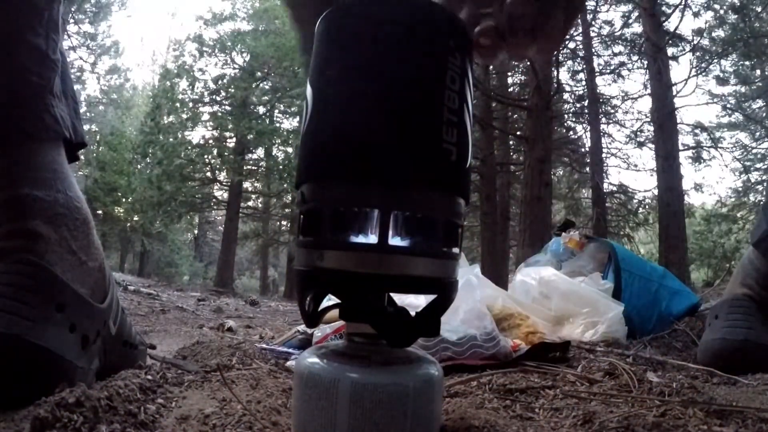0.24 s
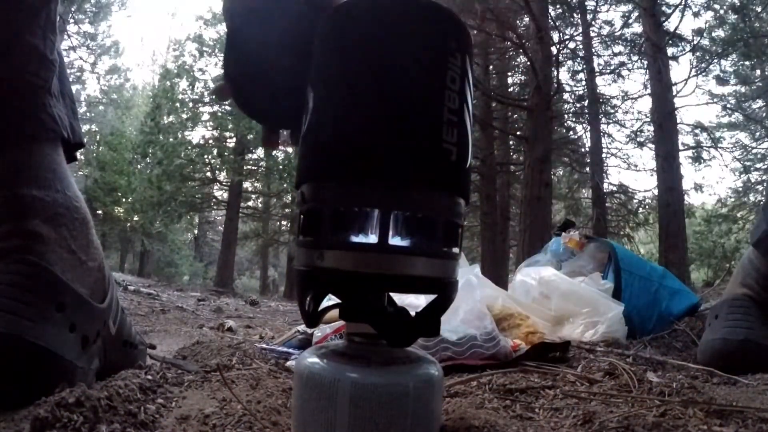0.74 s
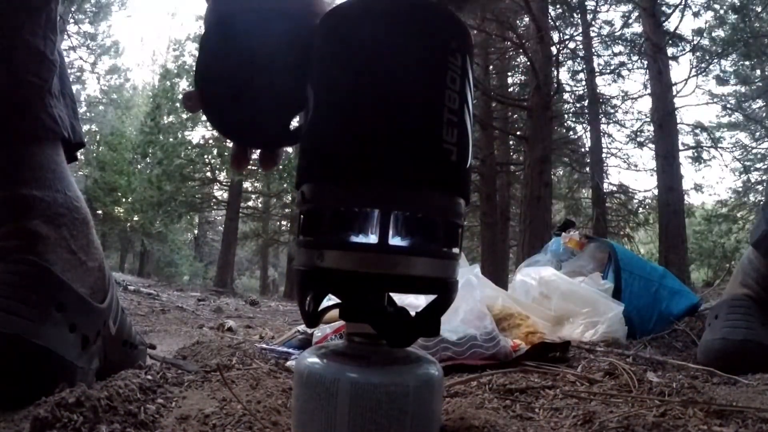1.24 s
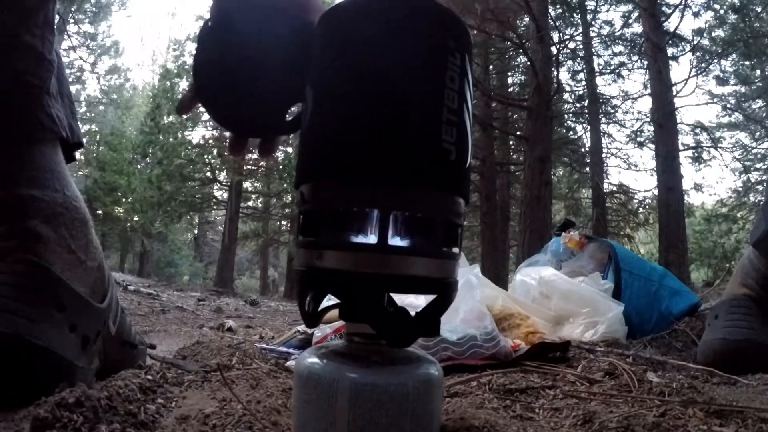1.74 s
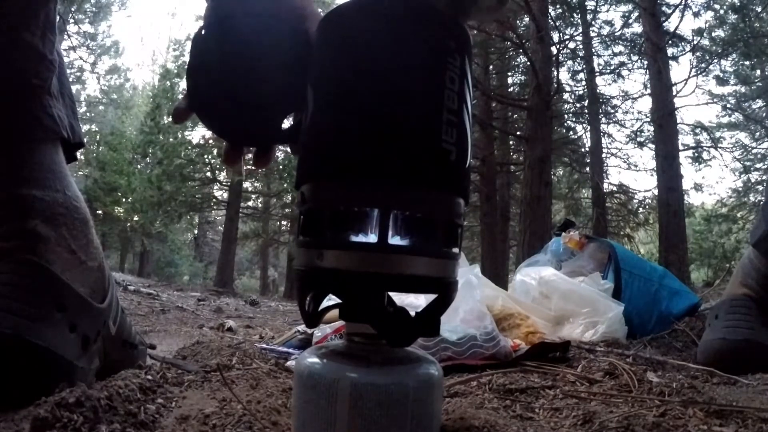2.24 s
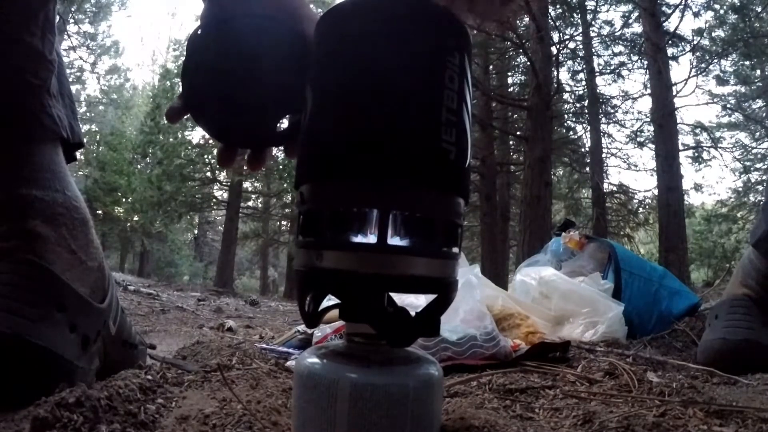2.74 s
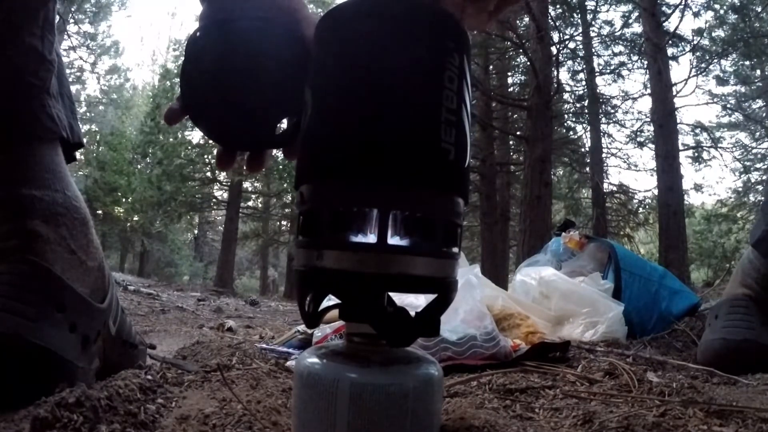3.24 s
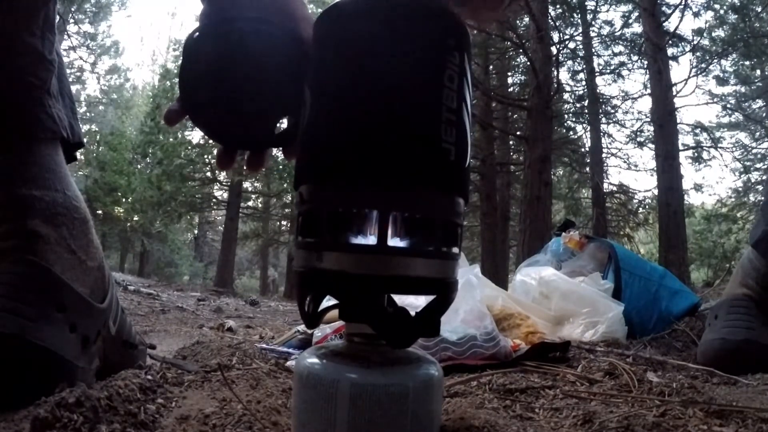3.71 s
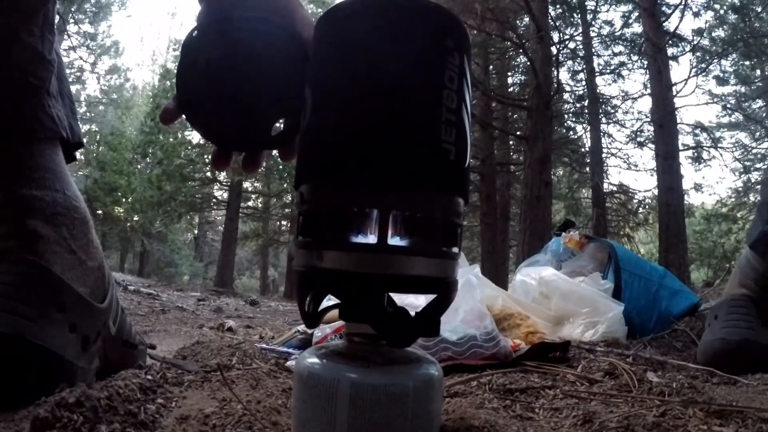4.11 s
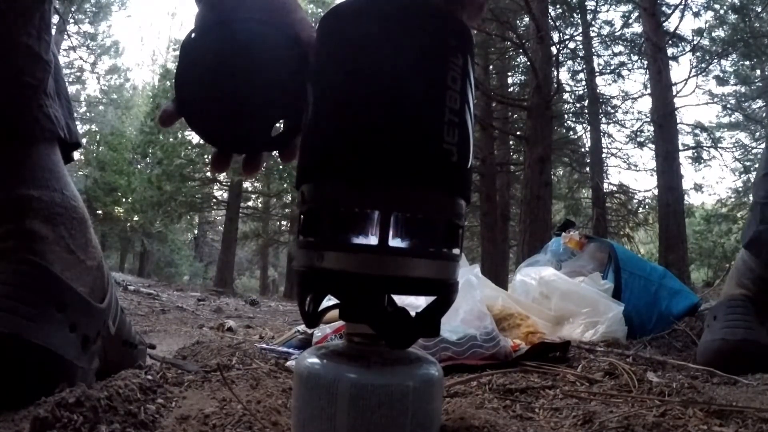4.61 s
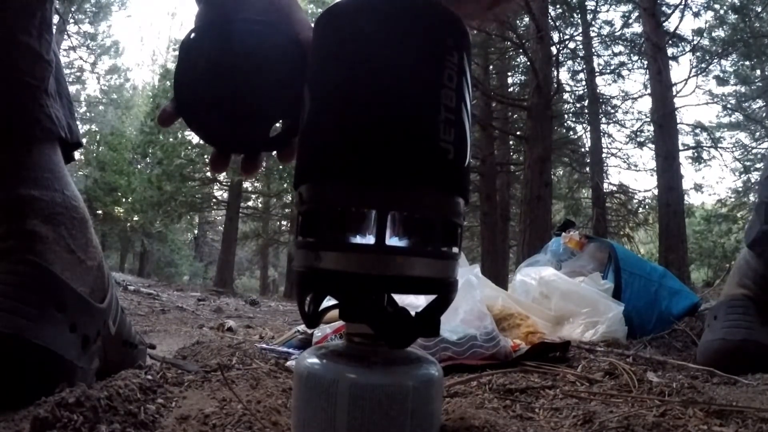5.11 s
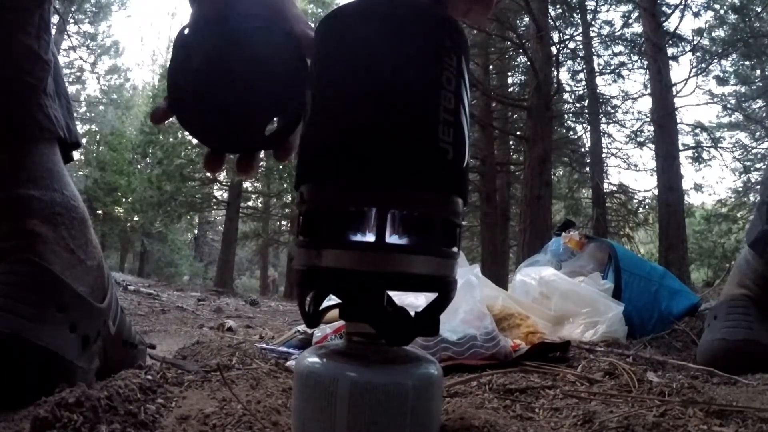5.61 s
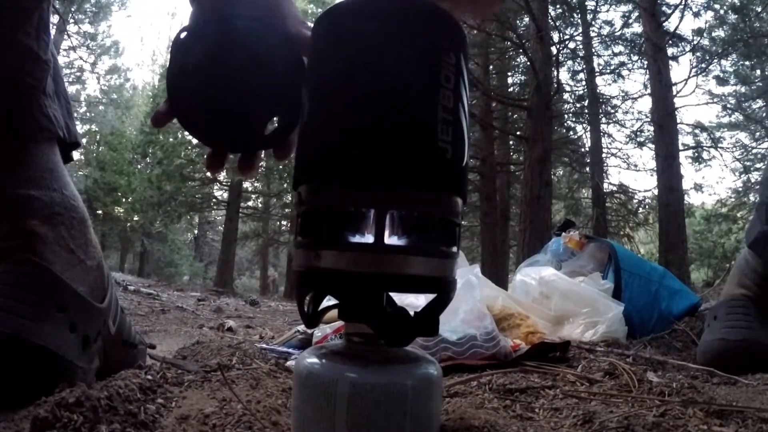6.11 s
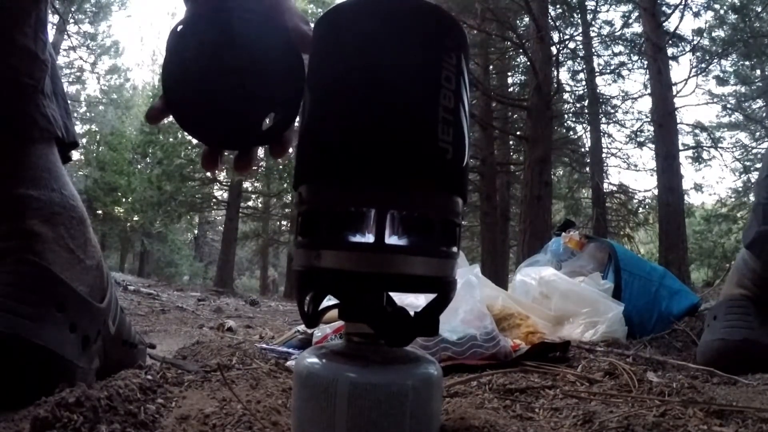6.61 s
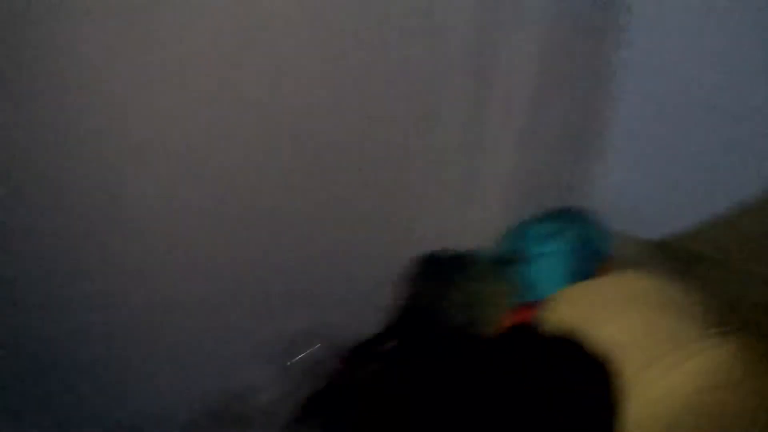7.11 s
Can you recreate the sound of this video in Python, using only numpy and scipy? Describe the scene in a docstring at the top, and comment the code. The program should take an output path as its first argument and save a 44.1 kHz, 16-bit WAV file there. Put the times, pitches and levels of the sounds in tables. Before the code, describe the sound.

Close steady gas flame rumbles and hisses under a pot with occasional spits and ticks, fades out, then a handled camera thumps amid swelling fabric rustle.

```python
"""A backpacking gas stove roars and flutters at full flame under a pot, close to a camera; its jet hisses. A
hand close to the pot colours the hiss until 0.95 s; throughout, the gas whistles faintly at drifting pitches.
From 2.5 s drips sizzle and spit on the hot metal and the pot ticks on its stand. The stove scene fades out from
5.96 s to silence at 6.85 s; then the scene changes to a tent, where nylon rustles ever louder while a hand
grips, knocks and scrapes the camera. Noise makes the gas, water and nylon; ringing modes the blows."""
import sys
import numpy as np
from scipy import signal
from scipy.fft import rfft, irfft
from scipy.io import wavfile

SR = 44100
rng = np.random.default_rng(int(sys.argv[2]) if len(sys.argv) > 2 else 0)


def bounce(signal):
    """Save signal as a 16-bit WAV file at the path given by the first command-line argument."""
    frames = np.transpose(np.atleast_2d(signal))
    limited = np.clip(frames, -1, 1)
    pcm = np.round(limited * 32767).astype(np.int16)
    wavfile.write(sys.argv[1], SR, pcm)


N = 324135
TIME_S, FREQ_HZ = np.arange(N) / SR, np.arange(N // 2 + 1) * SR / N
FADE_OUT_S, SILENT_S, FADE_POWER = 5.96, 6.852, 1.094
FADE_IN_S = 0.018  # tent, from SILENT_S

# flame strength re usual burn: t/s, level/dB
FLAME_STRENGTH = [(0.0, 0.5), (1.25, -0.5), (1.65, -2), (1.9, 1.5), (2.0, -3.5), (2.15, -1), (2.4, -1.2),
                  (3.3, -0.5), (3.7, 1), (4.15, 1), (4.4, 2), (5.1, -4.5), (5.2, 1), (5.35, -4), (5.45, 3),
                  (5.65, -3.5), (5.95, 1), (6.15, -2)]
# combustion roar, relative density: f/Hz, level/dB
ROAR_SPECTRUM = [(20, -63), (60, -50), (110, -31), (123, -30), (134, -9), (147, 0), (185, 1.5), (260, -6),
                 (400, -15), (700, -25), (950, -36), (1500, -49.5), (3000, -68.5)]


def flame(flutter, surge_db=0.5, flutter_db=0.86, sputter_db=1.0, boom_db=1.3, roar_db=-29.0):
    """Turbulent burning: flame surges, heat release flutters, small eddies sputter; the cup booms with the flutter."""
    strength_db = curves(FLAME_STRENGTH)[0] + surge_db * walk(4.4)
    sputter = walk(103)
    eddies = rng.standard_normal(N) * undb(strength_db + flutter_db * flutter + sputter_db * sputter)
    boom = band(eddies, 228, 88) * (undb(boom_db * flutter) - 1)
    return colour(eddies + boom, ROAR_SPECTRUM) * undb(roar_db)


# jet turbulence, relative density: f/Hz, level/dB
JET_SPECTRUM = [(400, -13), (1000, -9), (1450, -14), (1950, -3.5), (2600, -4), (3050, -7), (4600, -15.5),
                (6200, -13), (8300, -18.5), (8900, -20.5), (10000, -20), (11300, -28.5), (12600, -23),
                (15000, -40)]
# mixing tube and burner cavity: f/Hz, width/Hz, lift/dB
BURNER_MODES = [(1130, 180, 5.5), (2400, 340, 4), (2470, 120, 2), (2740, 110, 3), (3722, 25, 4),
                (3840, 230, 6), (4135, 80, 7.5), (4500, 60, 6.5), (4965, 130, 6.5), (5480, 220, 6),
                (6500, 450, 4), (8050, 350, 2)]
# gap between hand and pot, peaks and dips: f/Hz, width/Hz, lift/dB
HAND_GAP_MODES = [(2440, 100, 4), (2660, 130, -2), (2820, 80, 3), (3020, 170, -6), (3300, 160, 7.5),
                  (3630, 140, -6), (4050, 300, 1), (4950, 200, 2), (6550, 300, 3), (8900, 600, -4)]
# hand moves off: t/s, nearness/0-1
HAND_NEARNESS = [(0, .75), (.3, .7), (.43, 1), (.58, 0.7), (.72, 0.3), (.95, 0), (2.3, 0)]
# canister cools and loses pressure: the hiss sinks
JET_START_DB, JET_SAG_DB_PER_S = -47.5, 0.41


def jet(flutter, flutter_db=0.5, waver_db=0.9, wander_db=0.6):
    """Gas hisses out and rings the burner; registers waver and wander independently; a near hand filters it."""
    hiss = colour(rng.standard_normal(N), JET_SPECTRUM)
    hiss = vary_bands(hiss, [(2400, 380), (3900, 800), (5500, 990), (8200, 1300)], waver_db, 26)
    hiss = vary_bands(hiss, [(2300, 170), (2700, 140), (3300, 180)], wander_db, 6.2)
    hiss = unit(resonate(hiss, BURNER_MODES))
    through_gap = resonate(hiss, HAND_GAP_MODES)
    hiss = hiss + curves(HAND_NEARNESS)[0] * (through_gap - hiss)
    return hiss * undb(JET_START_DB - JET_SAG_DB_PER_S * TIME_S + flutter_db * flutter)


# drip: flash, sag as it shrinks, tail; hiss rises meanwhile
DRIP_ATTACK_SHARE, DRIP_TAIL_SHARE = 0.31, 0.3  # of drip length
DRIP_EDGE_S, DRIP_SAG_DB_PER_S, DRIP_RISE_OCT_PER_S = 0.0034, 71, 6.4


def boil(s, length_s):
    """Envelope of one drip: flash, sag, tail; a longer drip starts and ends more softly."""
    attack = ramp(s, DRIP_EDGE_S + DRIP_ATTACK_SHARE * length_s)
    sag_db = DRIP_SAG_DB_PER_S * length_s * ramp(s, length_s)
    tail = np.exp(-np.maximum(TIME_S - s - length_s, 0) / (DRIP_TAIL_SHARE * length_s))
    return attack * undb(-sag_db) * tail


# drips boiling off hot metal, levels before the envelope:
# t/s, length/s, steam/dB, steam centre f/Hz, spatter/dB, spray/dB
DRIP_EVENTS = [ (2.47, .1, -51, 2600, -48, -72), (3.383, 0.024, -51, 3450, -56, -74),
               (3.632, 0.038, -48, 3600, -45.5, -70), (3.708, .042, -53, 3600, -48.5, -70),
               (4.538, 0.045, -38.5, 3570, -48.5, -59), (4.595, 0.037, -44, 3500, -52, -60),
               (4.633, 0.032, -46.5, 2900, -59, -72), (4.693, 0.026, -41, 2750, -70, -76),
               (5.156, 0.1, -44, 3000, -67, -64), (5.222, 0.048, -38.5, 3300, -57, -70),
               (5.272, 0.04, -41.5, 4500, -59, -61), (5.314, 0.035, -45, 3400, -53, -74),
               (5.895, 0.0088, -42.5, 3250, -52, -74.5), (5.931, 0.012, -40, 3870, -52, -66),
               (5.955, .005, -42, 3600, -55, -72), (5.963, 0.019, -40, 3700, -49, -64),
               (5.992, .015, -39.5, 3300, -52, -64), (6.006, .016, -38, 4150, -51, -59),
               (6.022, 0.032, -42, 3850, -53, -60), (6.061, .009, -44.5, 3600, -62, -76),
               (6.106, .013, -49, 3600, -70, -79.5), (6.12, 0.011, -34.5, 3700, -70, -78)]
# escaping steam, relative density: f/Hz, level/dB
STEAM_SPECTRUM = [(1200, -11), (2000, 12), (2600, 7.5), (4500, 0.5), (6000, -1), (8500, -9), (15000, -20)]
# gaps between the fins under the pot: f/Hz, width/Hz, lift/dB
FIN_MODES = [(2770, 350, 8.5), (3270, 260, 2.5), (3665, 280, 10), (4360, 100, 8), (4900, 360, 5.5)]
# fine spray, relative density: f/Hz, level/dB
SPRAY_SPECTRUM = [(5000, -2), (8000, -4), (10000, 4), (11200, -1), (12400, 2), (13800, -2), (15000, -6)]


def sizzles(spatter_hz=1130, spatter_width_hz=520, steam_width_hz=2300):
    """Drips flash to steam between the fins; spatter rings the burner cavity; fine spray fizzes."""
    spitting = undb(1.5 * walk(170))
    steam = resonate(colour(crackle(spread_db=2.5) * spitting, STEAM_SPECTRUM), FIN_MODES)
    spatter = band_twice(crackle(spread_db=0.5), spatter_hz, spatter_width_hz)
    spray = colour(crackle(spread_db=1), SPRAY_SPECTRUM)
    out = np.zeros(N)
    for s, length_s, steam_db, hz, spatter_db, spray_db in DRIP_EVENTS:
        gone = ramp(s, length_s)
        rise = 2 ** (DRIP_RISE_OCT_PER_S * length_s / 2)
        early = band_twice(steam, hz / rise, steam_width_hz)
        late = band_twice(steam, hz * rise, steam_width_hz)
        puff = (1 - gone) * early + gone * late
        drip = undb(steam_db) * puff + undb(spatter_db) * spatter + undb(spray_db) * spray
        out += boil(s, length_s) * drip
    return out


# droplets bursting at once: t/s, level/dB, f/Hz
SPIT_EVENTS = [(2.516, -51, 10000), (3.406, -46, 3680), (3.666, -52, 9000), (3.737, -44, 3700),
               (4.575, -48, 9500), (5.251, -41, 3600), (5.939, -43, 5200), (6.068, -48, 3700)]


def spits(decay_s=0.0015, width_share=0.7):
    """Tiny droplets burst at once: abrupt band-noise ticks with exponential decay."""
    noise, out = rng.standard_normal(N), np.zeros(N)
    for s, db, hz in SPIT_EVENTS:
        tick = band_twice(noise, hz, width_share * hz)
        out += undb(db) * (TIME_S > s) * np.exp(-np.abs(TIME_S - s) / decay_s) * tick
    return out


# pot on its stand, relative levels: f/Hz, t60/s, level/dB
POT_MODES = [(557, 0.014, 0), (805, 0.017, 3.5), (1140, 0.023, 0), (1130, 0.052, -16), (2600, 0.0076, 1),
             (3640, 0.006, -1)]
# pot against stand, peak before the high-pass: t/s, level/dB
POT_TICKS = [(2.484, -34), (2.548, -31), (3.64, -35), (3.754, -36), (4.365, -23.5), (4.552, -26.5),
             (4.596, -29), (5.8955, -32), (5.9005, -32), (5.930, -33), (5.936, -31), (5.956, -32),
             (5.963, -34), (5.977, -31), (5.997, -35), (6.012, -32), (6.028, -30), (6.039, -30)]


def pot(pitch_share=0.03, scatter_db=0.5):
    """Pot shifts on its stand: light ticks without bass; each contact point rings a little differently."""
    out, chance = np.zeros(N), rng.standard_normal((len(POT_TICKS), len(POT_MODES) + 1))
    for (s, db), (detune, *weights) in zip(POT_TICKS, chance):
        stretch = 1 + pitch_share * detune
        modes = [(hz * stretch, t60_s, g + scatter_db * w) for (hz, t60_s, g), w in zip(POT_MODES, weights)]
        out += strike(modes, s, db, contact_s=0.000084)
    return highpass(out, 200)


# jet whistle, drifts then settles: t/s, f/Hz, level/dB
JET_WHISTLE = [(0, 8150, -72), (.17, 8450, -73.5), (.3, 8120, -74), (.47, 8330, -74), (.75, 8200, -78.5),
               (.93, 8600, -67), (1.15, 8500, -73.5), (1.3, 8200, -75), (1.52, 8620, -72),
               (1.8, 8300, -75.5), (2.2, 8000, -75.5), (2.7, 8070, -75)]
# breathy mixing-tube whistle near 5.5 kHz, drifts: t/s, f/Hz, level/dB
TUBE_WHISTLE = [(0, 5500, -60), (.55, 5490, -61), (.8, 5590, -59), (1.1, 5520, -61), (2.4, 5500, -62),
                (2.65, 5390, -65.5), (3.9, 5440, -64), (4.25, 5420, -59), (4.5, 5490, -62),
                (6.2, 5460, -64)]


def whistles(jet_width_hz=200, tube_width_hz=230):
    """Two breathy gas whistles: narrow noise drifting in pitch and strength."""
    jet_hz, jet_db = curves(JET_WHISTLE)
    tube_hz, tube_db = curves(TUBE_WHISTLE)
    return undb(jet_db) * narrow(jet_hz, jet_width_hz) + undb(tube_db) * narrow(tube_hz, tube_width_hz)


def crack(s, db, contact_s, crack_db=-11, decay_s=0.0019, hard_s=0.00016, centre_hz=4000):
    """Bright click of a blow, stronger for a hard, brief contact."""
    age_s = TIME_S - s
    noise = unit(band(rng.standard_normal(N), centre_hz, 2 * centre_hz))
    burst = (age_s > 0) * np.exp(-np.abs(age_s) / decay_s) * noise
    return burst * undb(db + crack_db) * np.exp(-contact_s / hard_s)


# camera housing, relative levels: f/Hz, t60/s, level/dB
HOUSING_MODES = [(67, 0.066, -0.5), (227, 0.15, -11.5), (357, 0.014, 4.5), (540, .025, -5.5),
                 (805, 0.014, -0.5), (1115, 0.039, -4.5), (1230, 0.026, -3.5), (1660, 0.033, -11.5),
                 (1870, 0.041, -6)]
# knocks on the camera, ring peak before the high-pass: t/s, level/dB, contact/s
KNOCK_EVENTS = [(6.8992, -34, 0.001), (6.9109, -10.5, 0.00072), (6.9173, -6.5, 0.0043),
                (6.989, -29, 0.0063), (7.034, -30.5, 0.0018), (7.1392, -27, 0.00066), (7.336, -17, 0.0041)]


def knocks():
    """Blows ring the camera housing and click."""
    blows = sum(strike(HOUSING_MODES, *knock) + crack(*knock) for knock in KNOCK_EVENTS)
    return highpass(blows, 31)  # microphone leaks steady pressure


# brightens as the slide speeds up; usual colour at NYLON_USUAL_S
NYLON_BRIGHTEN_DB_PER_S, NYLON_USUAL_S = 18, 7.14
# sliding nylon, relative density: f/Hz, level/dB
NYLON_SPECTRUM = [(100, 5), (200, 18), (380, 7), (1000, 3), (1900, -4.5), (2800, -5.5), (5500, -9.5),
                  (8000, -20), (11000, -28), (15000, -44)]
# camera shell: f/Hz, width/Hz, lift/dB
SHELL_MODES = [(1010, 130, 1), (1860, 170, 5), (3700, 200, 3), (5940, 360, 2)]


def fabric(patchy_db=3):
    """Nylon catches and slips in small jerks; folds shift the colour, which brightens with time."""
    catching = undb(1.6 * walk(70))
    rustle = colour(crackle(spread_db=1.5) * catching, NYLON_SPECTRUM)
    rustle = vary_bands(rustle, [(850, 300), (1400, 400), (2400, 600)], patchy_db, 20)
    rustle = unit(resonate(rustle, SHELL_MODES))
    bright_db = NYLON_BRIGHTEN_DB_PER_S * (TIME_S - NYLON_USUAL_S)
    return rustle + (undb(bright_db) - 1) * band(rustle, 8000, 8000)


NYLON_START_DB, NYLON_RISE_DB_PER_S = -53, 18.5  # start: SILENT_S
# folds of nylon slide past, lift before the swell: t/s, length/s, lift/dB
FOLD_SWISHES = [(6.915, 0.05, 4.5), (7.132, .06, 4.5), (7.24, 0.086, 5.5)]


def nylon():
    """Nylon slides ever louder; passing folds swell the level."""
    rising_db = NYLON_START_DB + NYLON_RISE_DB_PER_S * (TIME_S - SILENT_S)
    swish_db = sum(db * swell(s, length_s) for s, length_s, db in FOLD_SWISHES)
    return fabric() * undb(rising_db + swish_db)


def scrape(s, length_s, db, start_hz, end_hz, width_share=0.22):
    """Catch-and-slip friction: flickering narrow noise gliding in pitch."""
    hz = start_hz + (end_hz - start_hz) * ramp(s, length_s)
    catching = unit(undb(1.8 * walk(150)))
    return undb(db) * swell(s, length_s) * catching * narrow(hz, width_share * start_hz)


# fingers and nylon on the housing, level before the swell: t/s, length/s, level/dB, start f/Hz, end f/Hz
SCRAPE_EVENTS = [(6.886, 0.033, -44, 620, 725), (6.927, .035, -51, 1080, 920), (6.94, .14, -54, 1060, 960),
                 (7.02, .12, -60, 1880, 1910), (7.139, 0.049, -50, 1020, 1140),
                 (7.15, .04, -57, 2150, 2500), (7.262, .04, -51, 1400, 1960),
                 (7.275, 0.047, -53, 2250, 2560), (7.28, .045, -46.5, 950, 860),
                 (7.283, .05, -46, 1950, 1650), (7.259, 0.064, -53, 6100, 4300)]


def scrapes():
    """Fingers and nylon scrape over the camera housing."""
    return sum(scrape(*row) for row in SCRAPE_EVENTS)


# grip on the camera, relative density: f/Hz, level/dB
GRIP_SPECTRUM = [(12, -20), (28, -6.5), (45, -12), (80, -28), (130, -24), (400, -90)]


def grip(grip_db=-39):
    """Low rumble of the hand gripping the camera."""
    return colour(rng.standard_normal(N), GRIP_SPECTRUM) * undb(grip_db)


def tent():
    """Knocks and scrapes on the camera over nylon and grip rumble that fade in."""
    return knocks() + scrapes() + ramp(SILENT_S, FADE_IN_S) * (nylon() + grip())


def strike(modes, s, db, contact_s):
    """A blow at time s rings the modes; a longer contact makes it duller."""
    t = TIME_S[:SR // 4]
    ring = np.zeros(len(t))
    for hz, t60_s, g in modes:
        ring += undb(g) * np.sin(2 * np.pi * hz * t) * np.exp(-np.log(1000) * t / t60_s)
    push = np.sin(np.pi * np.minimum(t / contact_s, 1)) ** 2
    hit = signal.fftconvolve(ring, push)[:len(t)]
    return undb(db) * np.interp(TIME_S - s, t, hit / np.abs(hit).max(), left=0, right=0)


def crackle(spread_db):
    """Noise in dense tiny bursts of 16 samples, a few much larger than the rest."""
    sizes = np.minimum(rng.exponential(size=N // 16 + 1), 4)
    return rng.standard_normal(N) * undb(spread_db * np.repeat(sizes, 16)[:N])


def narrow(hz, width_hz):
    """Narrow noise whose centre follows hz; rms 1."""
    blur = signal.butter(2, width_hz / 2, fs=SR, output="sos")
    sway = signal.sosfilt(blur, rng.standard_normal(N) + 1j * rng.standard_normal(N))
    return unit(np.real(sway * np.exp(2j * np.pi * np.cumsum(hz) / SR)))


def vary_bands(x, bands, spread_db, rate_hz):
    """Let the gain of each (Hz, width Hz) band wander on its own."""
    for hz, width_hz in bands:
        x = x + (undb(spread_db * walk(rate_hz)) - 1) * band(x, hz, width_hz)
    return x


def resonate(x, modes):
    """Lift or dip x at each resonance of a cavity."""
    for hz, width_hz, db in modes:
        x = x + (undb(db) - 1) * band(x, hz, width_hz)
    return x


def band(x, hz, width_hz):
    """One resonance, gain 1 at its centre."""
    return signal.lfilter(*signal.iirpeak(hz, hz / width_hz, fs=SR), x)


def band_twice(x, hz, width_hz):
    """The same resonance twice in series; rms 1."""
    return unit(band(band(x, hz, width_hz), hz, width_hz))


def colour(x, points):
    """Filter x by a response of (Hz, dB) points; rms 1."""
    hz, db = np.transpose(points)
    gain_db = np.interp(np.log(FREQ_HZ + 1), np.log(hz), db)
    return unit(irfft(rfft(x) * undb(gain_db), N))


def highpass(x, hz):
    """Attenuate what lies below hz."""
    return signal.sosfilt(signal.butter(2, hz, "high", fs=SR, output="sos"), x)


def walk(rate_hz):
    """Smooth random motion, rms 1, Gaussian low-pass at rate_hz."""
    return unit(irfft(rfft(rng.standard_normal(N)) * np.exp(-(FREQ_HZ / rate_hz) ** 2), N))


def curves(table):
    """Each column of a time table, sample by sample."""
    s, *columns = np.transpose(table)
    return [np.interp(TIME_S, s, c) for c in columns]


def ramp(s, length_s):
    """Rise from 0 at time s to 1 after length_s."""
    return np.clip((TIME_S - s) / length_s, 0, 1)


def swell(s, length_s):
    """Parabolic burst from time s, peak 0.77."""
    return 0.77 * np.maximum(1 - (2 * (TIME_S - s) / length_s - 1) ** 2, 0)


def undb(db):
    """Decibels to gain."""
    return 10 ** (np.asarray(db) / 20)


def unit(x):
    """Scale to rms 1."""
    return x / np.sqrt(np.mean(x ** 2))


def scene():
    """The stove scene fades to silence, then the scene changes to the tent."""
    flutter = walk(34.0)  # shared by flame and jet
    stove = flame(flutter) + jet(flutter) + sizzles() + spits() + pot() + whistles()
    fade = (1 - ramp(FADE_OUT_S, SILENT_S - FADE_OUT_S)) ** FADE_POWER
    return (stove * fade + tent())[None]


def record(dry, top_hz=15100):
    """The camera cuts the top: steep elliptic low-pass."""
    return signal.sosfilt(signal.ellip(10, 0.2, 80, top_hz, fs=SR, output="sos"), dry)


dry = scene()
out = record(dry)
bounce(out)
```